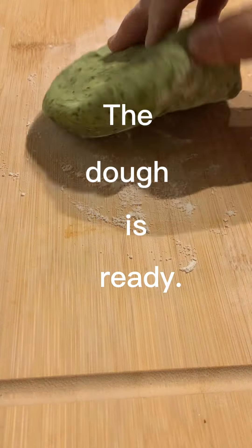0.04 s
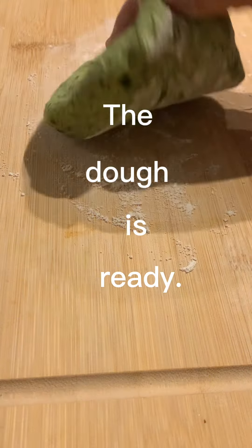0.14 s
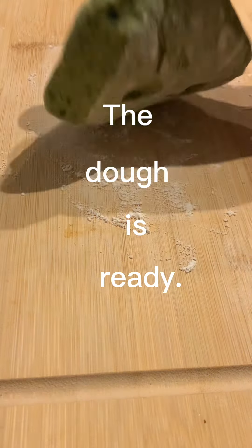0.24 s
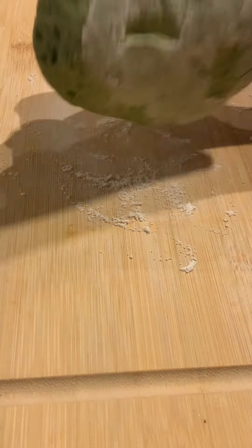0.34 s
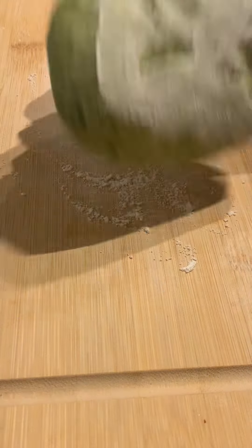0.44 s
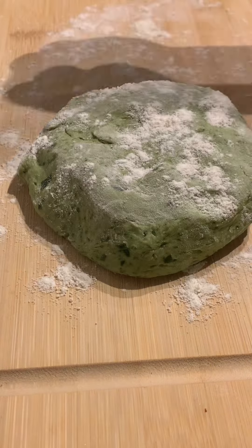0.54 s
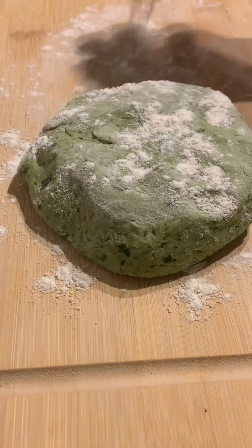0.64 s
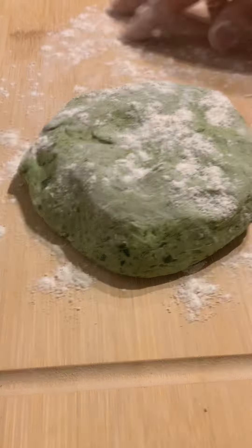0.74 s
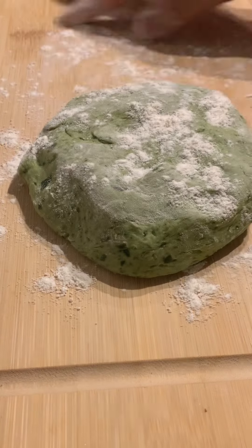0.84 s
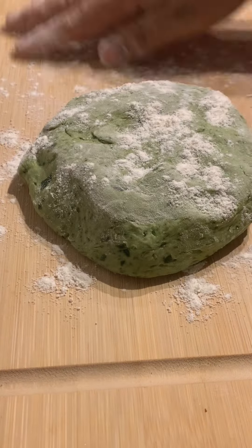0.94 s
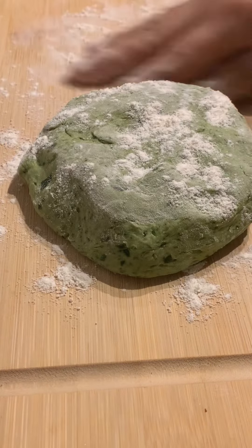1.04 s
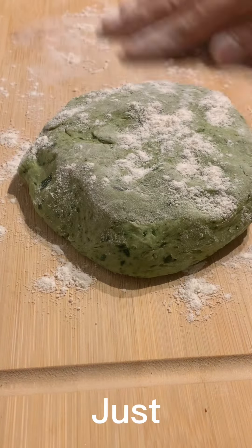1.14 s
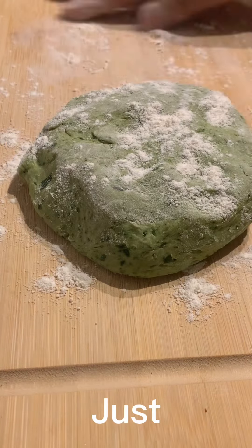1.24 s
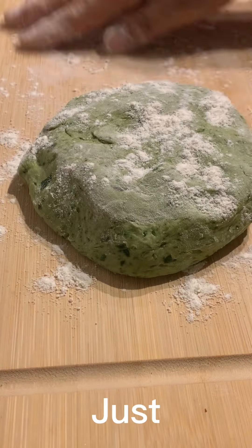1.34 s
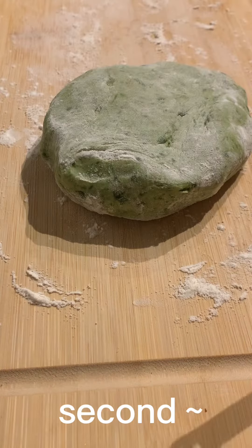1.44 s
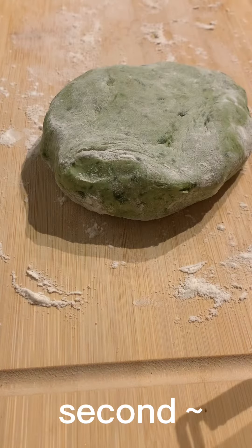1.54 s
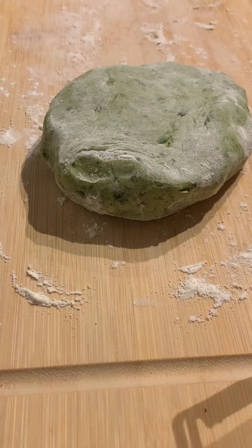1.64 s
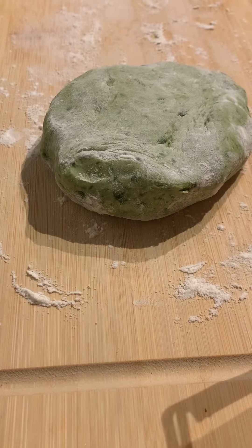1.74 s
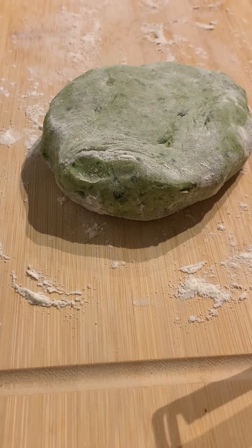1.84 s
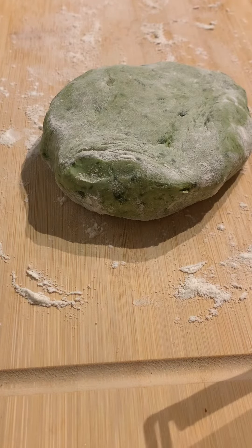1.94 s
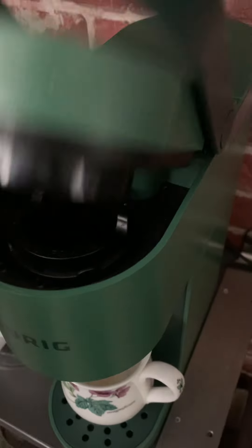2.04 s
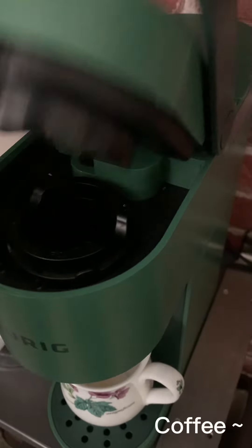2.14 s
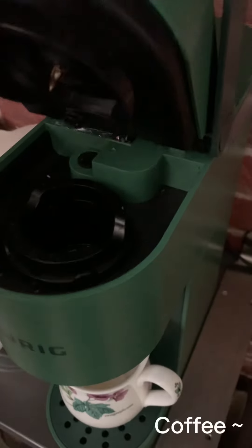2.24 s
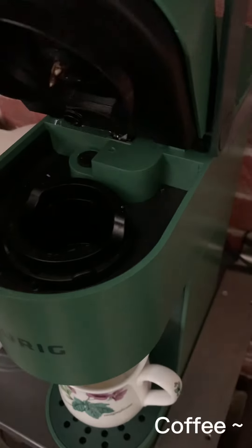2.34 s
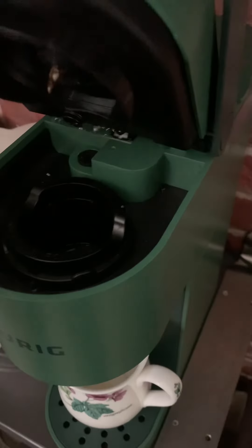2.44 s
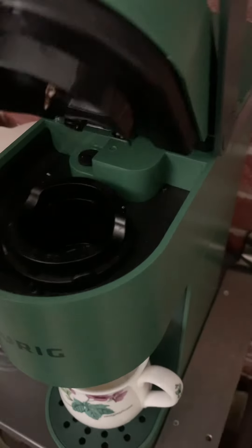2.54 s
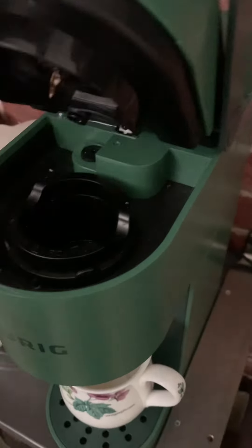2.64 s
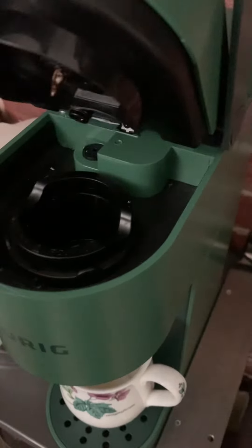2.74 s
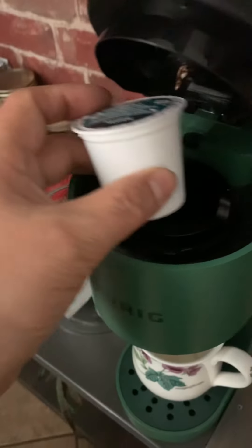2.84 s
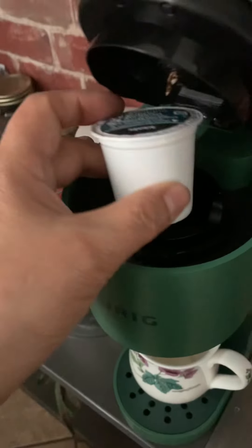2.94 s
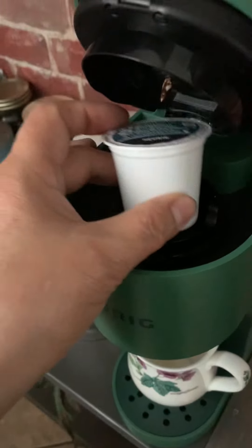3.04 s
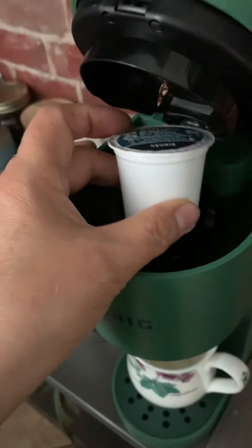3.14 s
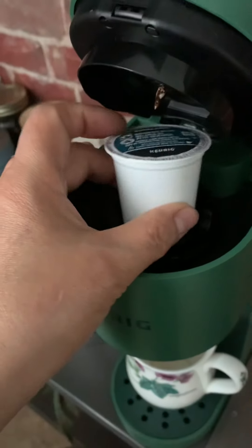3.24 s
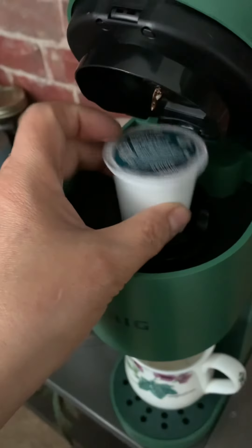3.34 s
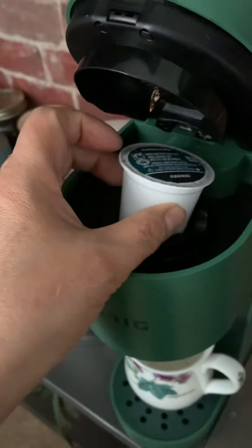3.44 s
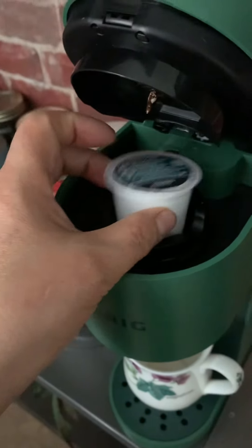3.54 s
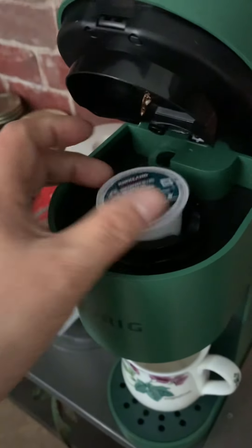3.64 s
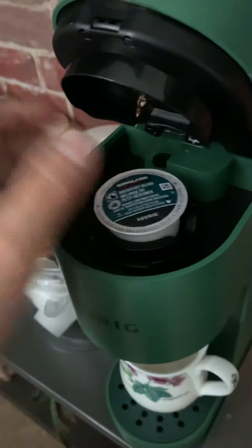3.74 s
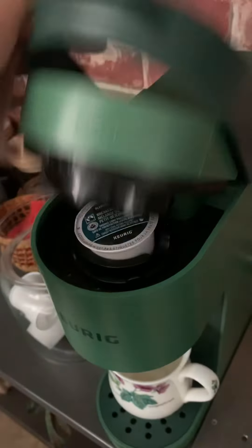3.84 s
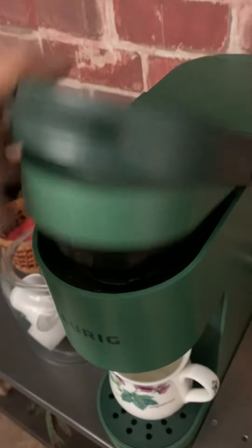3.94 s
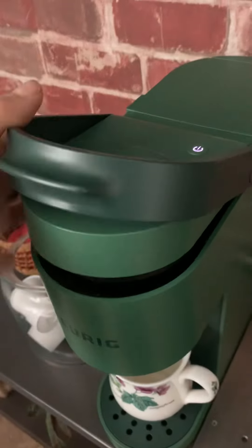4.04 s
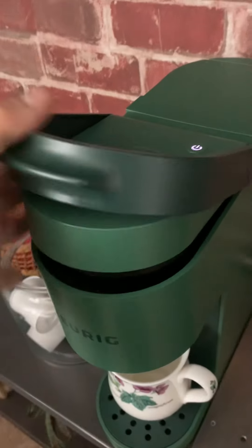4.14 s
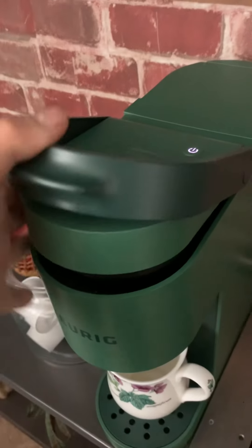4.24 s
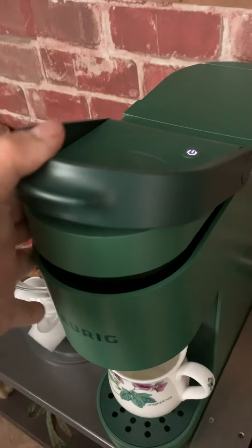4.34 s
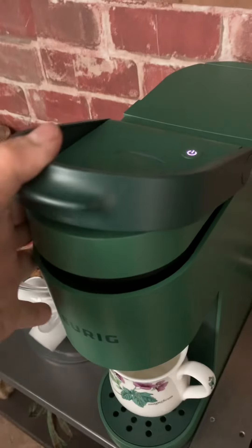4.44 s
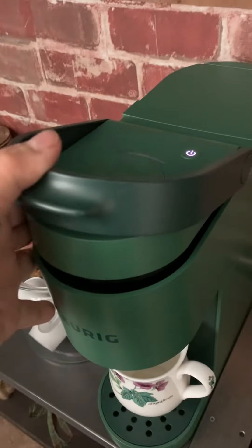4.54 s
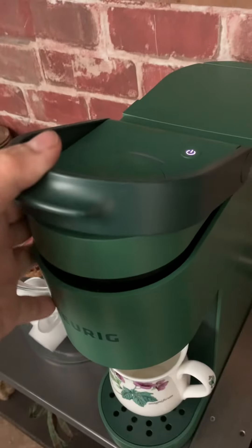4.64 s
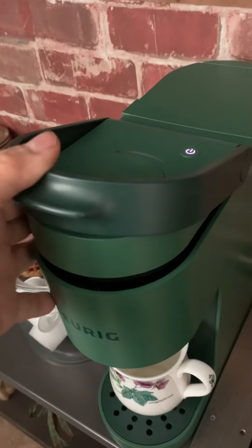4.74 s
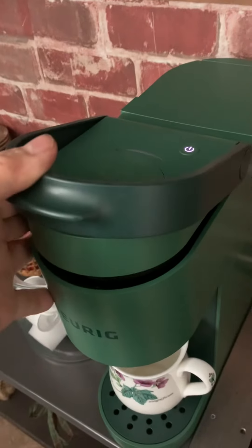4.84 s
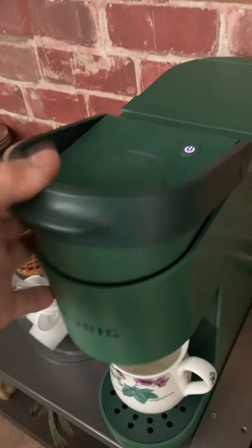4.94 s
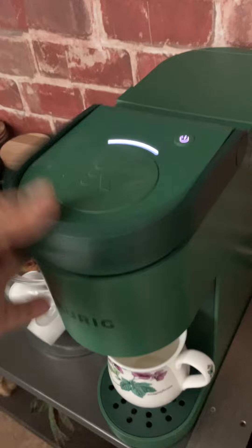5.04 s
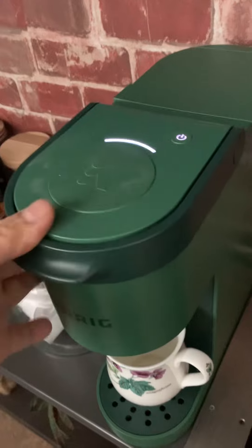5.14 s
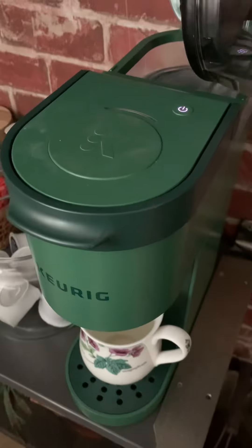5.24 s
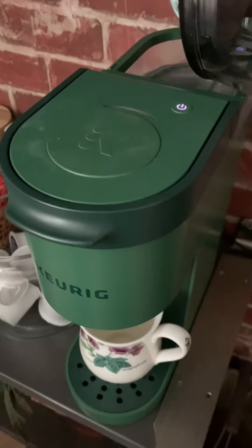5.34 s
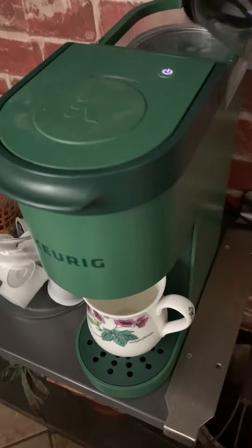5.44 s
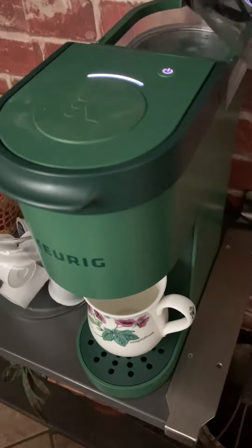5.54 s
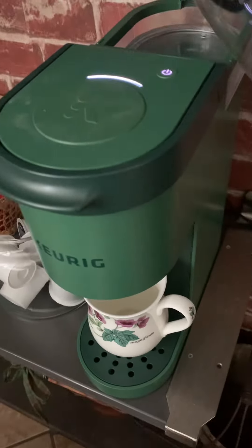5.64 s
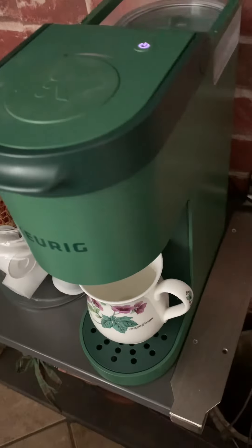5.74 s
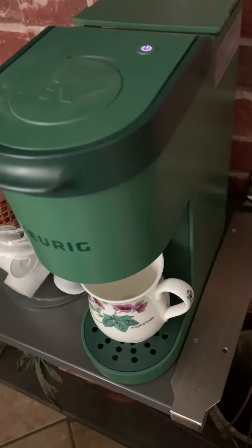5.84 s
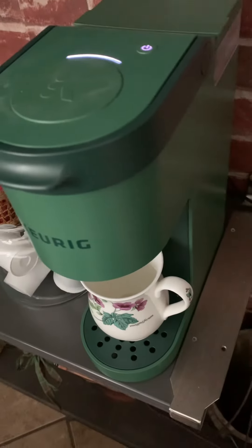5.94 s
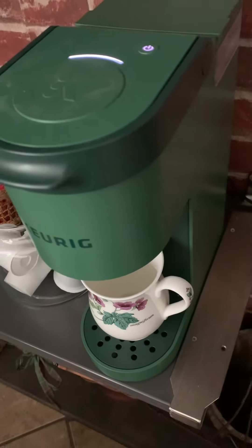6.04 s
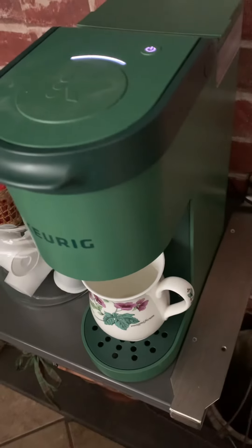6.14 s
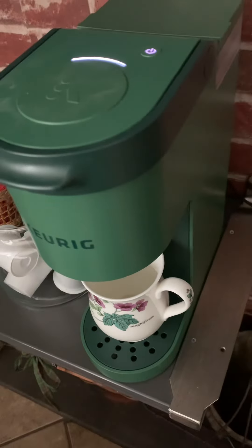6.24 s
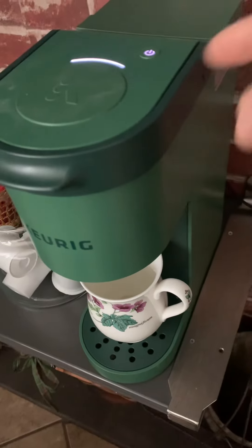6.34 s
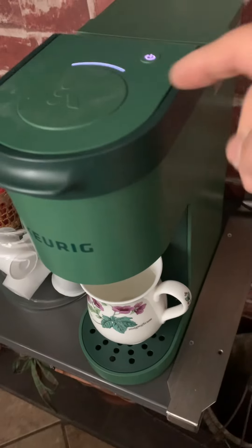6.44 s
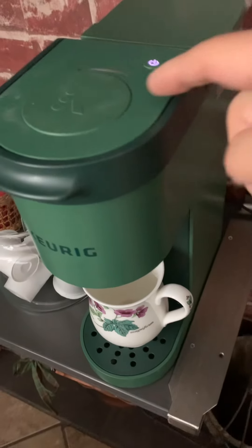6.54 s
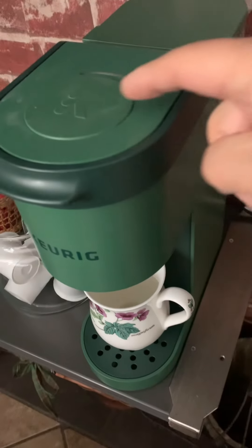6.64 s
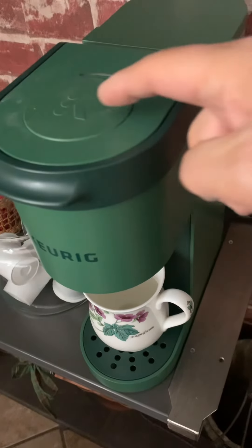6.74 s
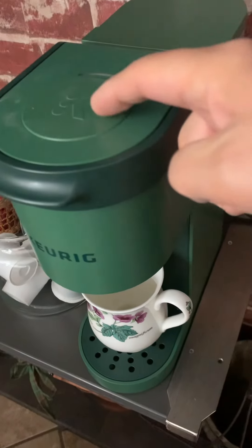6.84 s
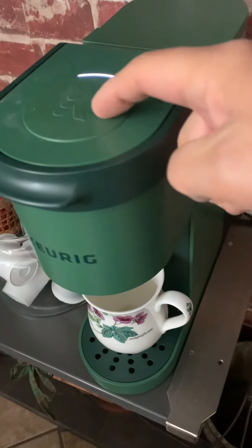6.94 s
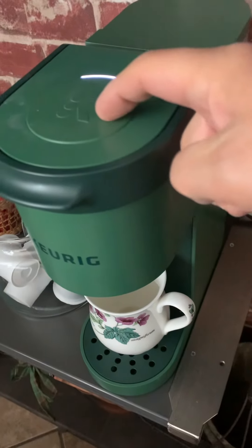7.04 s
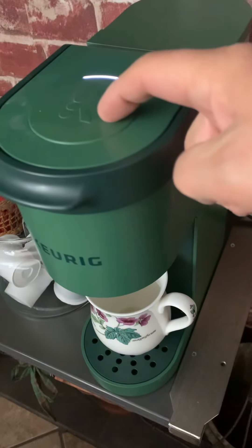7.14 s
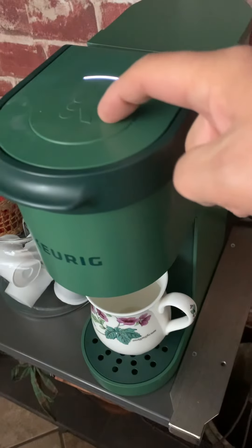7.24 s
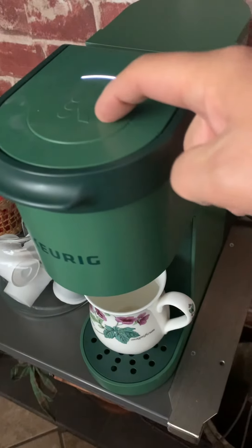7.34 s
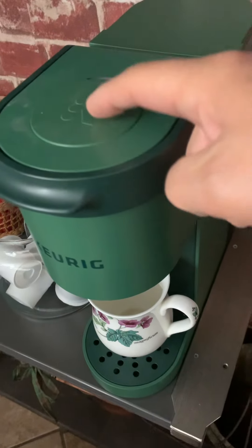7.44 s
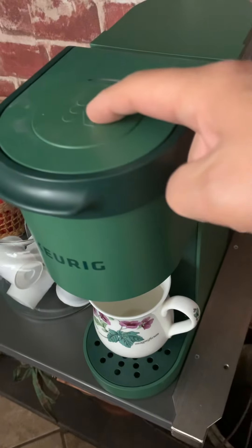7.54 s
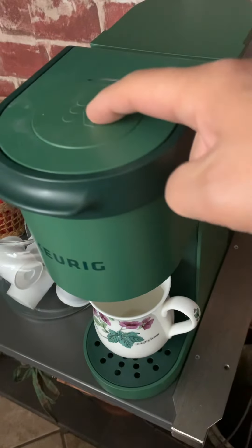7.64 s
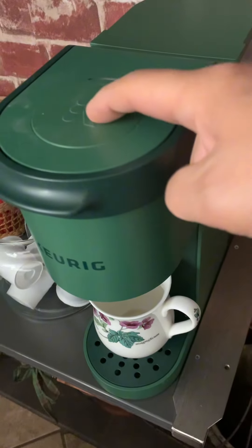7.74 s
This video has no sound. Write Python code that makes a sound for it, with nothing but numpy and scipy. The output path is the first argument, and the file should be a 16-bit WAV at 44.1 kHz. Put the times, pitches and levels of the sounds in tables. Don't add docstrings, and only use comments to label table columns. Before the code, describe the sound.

Quiet dry brushing on wood, a soft dough thump and a grainy palm sweep come first, then near silence with faint ticks. Hard plastic sounds follow at arm's length: handle knocks, rubbing, light pod taps, one sharp dominant lid clap, a small snap, a rattly latch, a hinge clack and a hollow cover knock. A long lull of faint rumble ends with a small double click. Short kitchen echo, with sudden scene changes.

```python
import sys
import numpy as np
from scipy import signal
from scipy.fft import rfft, irfft
from scipy.io import wavfile

SR = 44100
rng = np.random.default_rng(int(sys.argv[2]) if len(sys.argv) > 2 else 0)


def nominal_scale(level):
    x = np.asarray(level, float) / 20
    return 10 ** x


def master(y):
    cut = np.clip(np.atleast_2d(y).T, -1, 1)
    pcm = np.round(cut * 32767)
    wavfile.write(sys.argv[1], SR, pcm.astype(np.int16))


N = 343539

SCENE_CHANGES = [0, .5485, 1.389, 2.007, 2.807, 3.848, 5.002, 5.236, 5.45, 7.79]


def rms_one(x):
    return x / np.sqrt(np.mean(x ** 2) + 1e-20)


def band(x, low_hz, high_hz):
    return signal.sosfilt(signal.butter(2, [low_hz, high_hz], "band", fs=SR, output="sos"), x)


def flicker(rate_hz, depth_db):
    settle = 1500
    r = np.exp(-64 * np.pi * rate_hz / SR)
    noise = rng.standard_normal(N // 32 + settle + 2)
    slow = signal.lfilter([1], [1, -2 * r, r * r], noise)[settle:]
    return nominal_scale(depth_db * np.interp(np.arange(N) / 32, np.arange(len(slow)), rms_one(slow)))


def coloured(spectrum, low_hz, high_hz):
    hz, points = np.fft.rfftfreq(N, 1 / SR) + 1, np.array(spectrum)
    level_db = np.interp(np.log(hz), np.log(points[:, 0]), points[:, 1])
    gain = nominal_scale(level_db) * (hz > low_hz) * (hz < high_hz)
    return rms_one(irfft(rfft(rng.standard_normal(N)) * gain, N))


BLOW_BANDS = [600, 3000, 7000, 16500]


def blows(hits, modes, cycles, crack_db, rattle_db, rattle_s, top_db, bass_hz=170):
    size = 8192
    out, t = np.zeros(N), np.arange(size) / SR
    hz, level_db = np.transpose(modes)[:, :, None]
    bands = zip([bass_hz, *BLOW_BANDS], BLOW_BANDS)
    filters = [signal.butter(3, edges, "band", fs=SR, output="sos") for edges in bands]
    responses = [signal.sosfreqz(sos, np.fft.rfftfreq(size, 1 / SR), fs=SR)[1] for sos in filters]
    group = np.searchsorted(BLOW_BANDS, hz[:, 0])
    for s, mid_db, weight_db, hard_db, *shine_db in hits:
        ring = np.clip(0.88 + 0.0085 * weight_db - 0.019 * hard_db, .3, 1.2)
        strength = nominal_scale(level_db + 1.2 * rng.standard_normal(hz.shape))
        fall_db = -60 * t * hz ** .8 / (ring * cycles)
        sines = strength * np.sin(2 * np.pi * hz * t * rng.normal(1, .008, hz.shape))
        click = 2.2 + rfft(rng.standard_normal(size) * nominal_scale(-10 - 60 * t / .004))
        rattle_fall_db = rattle_db - 5.5 - 60 * t / (rattle_s * ring)
        rattle = rfft(rng.standard_normal(size) * nominal_scale(rattle_fall_db))
        at = round(s * SR)
        next_change = SCENE_CHANGES[np.searchsorted(SCENE_CHANGES, s)]
        sounding = np.clip((next_change - s - t) / .003, 0, 1)
        shine = hard_db + top_db + sum(shine_db)
        for k, db in enumerate(mid_db + np.array([weight_db, 0, hard_db, shine])):
            free = rfft((sines * nominal_scale(fall_db))[group == k].sum(axis=0))
            damped = rfft((sines * nominal_scale(4 * fall_db))[group == k].sum(axis=0))
            flat = nominal_scale(crack_db + 2.5 * k) * (np.abs(damped).max() + 1e-9)
            part = irfft(responses[k] * (click * (free + flat) + rattle * (damped + flat)), size)
            out[at:at + size] += (nominal_scale(db) * sounding * part / np.abs(part).max())[:N - at]
    return out


# start_s, level_db (peak, 600-3000 Hz), weight_db (thud below 600 Hz over level),
# hardness_db (3-7 kHz snap over level), for some shine_db (extra above 7 kHz)
LID_HITS = [(3.8604, -45.5, -2, -2), (3.914, -38.5, 5.5, 1.5), (3.9212, -4, -30, -7, -2),
            (3.9365, -15, -16, -16, -8), (3.9815, -21, -13, -2, -15), (3.9882, -3, -18, -6, 6),
            (4.0494, -30, -20, 9, 3), (4.0512, -34, -20, 10, -3), (4.1953, -42, -14, 2, 10),
            (4.211, -46, -10, -14), (4.2202, -58, -6, 4, 8), (4.232, -48, -6, -10),
            (4.2541, -48, -12, 2, 6)]
# pitch_hz, level_db
LID_MODES = [(330, -16), (550, -3), (716, -6), (1420, 11), (1860, 0), (2170, 10), (2840, 3), (3450, 1),
             (4060, 3.5), (4750, 2.5), (6500, -1.5), (7200, -1.5), (10000, -5), (13000, -3)]


def lid():
    return blows(LID_HITS, LID_MODES, cycles=6.0, crack_db=-24.0, rattle_db=-10.5, rattle_s=.07, top_db=-9)


# start_s, level_db, weight_db, hardness_db, shine_db
CATCH_HITS = [(4.337, -58, -20, -12), (4.3604, -12, -45, -12, -3), (4.3886, -43, -28, -8, 0),
              (4.445, -62, -10, 8, -12), (4.456, -29, -28, -16, -15), (4.4726, -56, -8, 0, -10),
              (4.5263, -54, -10, 0, -15), (4.5458, -55, -9, -2, -15), (4.554, -59, -9, -2, -15),
              (4.5737, -56, -16, 0, -15), (4.6315, -58, -8, -3, -15), (4.678, -62, -8, -15)]
# pitch_hz, level_db
CATCH_MODES = [(145, 0), (690, -30), (1100, -15), (1460, -15), (2100, 0), (2450, -1), (2700, 3), (2900, 4),
               (3470, 2), (3870, 3), (4900, -3), (8160, 0)]


def catch():
    return blows(CATCH_HITS, CATCH_MODES, cycles=6.0, crack_db=-24, rattle_db=-12, rattle_s=0.03,
                 top_db=-17, bass_hz=109)


# start_s, level_db, weight_db, hardness_db, shine_db
LATCH_HITS = [
    (4.7628, -56.5, -11.5, -5.5),
    (4.783, -54, -13, 6, 4),
    (4.7875, -44, -13, -1, 2),
    (4.7991, -40.5, -34.5, -7.5),
    (4.8916, -54, -8, 16, -2),
    (4.9031, -42.5, -35.5, 2),
    (4.9147, -17, -30, 13, -3),
    (4.9278, -13, -6, 4, 1),
    (4.9315, -14, 0, -14),
    (4.9417, -23, 4, 0),
]
# pitch_hz, level_db
LATCH_MODES = [(260, -7), (530, 5), (720, 6), (1100, -6), (1500, -8), (2100, -20), (2900, 5), (3490, 1),
               (4900, 3), (5500, 1), (7100, -8), (7750, 0)]


def latch():
    return blows(LATCH_HITS, LATCH_MODES, cycles=7.0, crack_db=-19, rattle_db=-6.0, rattle_s=0.13, top_db=-4.5)


# start_s, level_db, weight_db, hardness_db, shine_db
HINGE_HITS = [(5.074, -40, 2, -12), (5.0885, -27, 0, -4), (5.0915, -12, -9, 8, 6),
              (5.0928, -17, -14, 14, -11), (5.097, -21, -3, -9, -8), (5.126, -32, -2, -3, -6),
              (5.142, -34, 3, -2, -6), (5.2416, -41, 0, -12), (5.279, -70, -5, 0, 8),
              (5.2886, -70, 3, 20, -12), (5.306, -74, -5, 0, 8), (5.3262, -59, 0, -3, 2),
              (5.3475, -61.5, 3.5, 0.5), (5.5727, -57, -12, 3, 8)]
# pitch_hz, level_db
HINGE_MODES = [(195, 0), (330, -9), (520, -8), (650, 2), (860, 1), (1530, 4), (2870, -10), (3430, -6),
               (3950, -7), (4640, 5), (5070, 4), (5510, 3), (6860, -5), (8670, -10), (12800, -8)]


def hinge():
    return blows(HINGE_HITS, HINGE_MODES, cycles=4.3, crack_db=-18, rattle_db=-14, rattle_s=0.15, top_db=-11)


# start_s, level_db, weight_db, hardness_db, shine_db
COVER_HITS = [
    (5.7663, -71.5, 21.5, 2.4),
    (5.7802, -56, 12, -2),
    (5.791, -52, 16, -6),
    (5.8024, -14, 3, 3, 5),
    (5.8167, -36, 14, -2, -8),
    (5.8257, -34, 10, 5, -6),
    (5.8515, -19, -9, 2, 2),
]
# pitch_hz, level_db
COVER_MODES = [(205, 14), (343, 12), (490, 14), (580, 21), (800, 11), (1300, 6), (1990, 9), (2350, 7),
               (3400, 3), (4500, 5), (5700, 0), (8900, -14), (11500, 0), (12900, 2)]


def tank_cover():
    return blows(COVER_HITS, COVER_MODES, cycles=5.6, crack_db=-15.0, rattle_db=-5, rattle_s=0.081, top_db=4.0)


# start_s, level_db, weight_db, hardness_db, shine_db
POD_HITS = [
    (3.1394, -32, -14, -26, -14),
    (3.273, -45, -10, -10),
    (3.288, -26, -19.5, -13, -4),
    (3.3643, -17, -19, -12, 3),
    (3.3709, -27, -7.5, -9.5),
    (3.5078, -36.5, -19.5, -9),
    (3.5644, -26.5, -20, -10),
    (3.6081, -32, 3, 1, 4),
    (3.66, -62, -10, 4, 10),
]
# pitch_hz, level_db
POD_MODES = [(335, -6.5), (565, -2), (940, 2.5), (1300, 9), (2040, 5), (2450, 4), (3400, 11.5), (4450, 8),
             (6250, 9.5), (7800, 0)]


def pod():
    return blows(POD_HITS, POD_MODES, cycles=4.5, crack_db=-12, rattle_db=-8, rattle_s=0.033, top_db=-1)


# start_s, level_db, weight_db, hardness_db, shine_db
HANDLE_HITS = [
    (2.2192, -38, -4, -14, -10),
    (2.2297, -24, -11, -10.5, -10),
    (2.2438, -32, -5, 7, -5),
    (2.3105, -58, -8, 0, 3),
    (2.4606, -52, -12, -1),
    (2.4781, -34, -4, -9, -26),
    (2.588, -62, 4, -2, 6),
    (2.8073, -36, -16, -9.5),
]
# pitch_hz, level_db
HANDLE_MODES = [(208, -3), (333, 2.5), (457, -5.5), (910, 2.5), (1600, -6), (1900, 2), (3450, 0), (4600, 3),
                (6300, 0), (8300, 5), (10200, 0)]


def handle():
    return blows(HANDLE_HITS, HANDLE_MODES, cycles=8.7, crack_db=-9.5, rattle_db=-5.0, rattle_s=0.077, top_db=-3)


# start_s, level_db, weight_db, hardness_db, shine_db
BUTTON_HITS = [
    (7.6218, -73, 12, -5),
    (7.7358, -35, -8, -3, -9),
    (7.7612, -36, -7, 5, 2),
    (7.7655, -50, 14, 12, 2),
]
# pitch_hz, level_db
BUTTON_MODES = [(295, 0), (748, -2), (1700, 1), (2750, 4), (3110, 8), (3800, 2), (5500, 5), (7600, 10),
                (11400, 9)]


def button():
    return blows(BUTTON_HITS, BUTTON_MODES, cycles=7.6, crack_db=-13, rattle_db=-0.5, rattle_s=0.048, top_db=6)


# start_s, level_db, weight_db, hardness_db
DOUGH_HITS = [
    (.454, -45, 1, -13),
    (.465, -50, 20, -16),
    (.488, -58, 25, -18),
    (.534, -44, 3, -16),
    (1.949, -76, 22, -3),
]
# pitch_hz, level_db
BOARD_MODES = [(90, 8), (132, 5), (203, -3.5), (700, -20), (1200, -12), (1700, -14), (2770, -12)]


def dough():
    return blows(DOUGH_HITS, BOARD_MODES, cycles=9.0, crack_db=-22, rattle_db=-8, rattle_s=.09,
                 top_db=-6, bass_hz=60)


# start_s, level_db, weight_db, hardness_db
CRUMB_HITS = [
    (1.452, -72, -15, 2),
    (1.49, -76, -15, 6),
    (1.551, -72, -20, 11),
    (1.663, -76, -15, 6),
    (1.68, -64, -20, 0),
    (1.775, -78, -15, 6),
]
# pitch_hz, level_db
CRUMB_MODES = [(300, 0), (1500, 0), (2200, -3), (2700, 0), (4600, 0), (5200, -2), (6200, 0), (8000, 0),
               (13700, -6)]


def crumbs():
    return blows(CRUMB_HITS, CRUMB_MODES, cycles=9.0, crack_db=-12, rattle_db=1, rattle_s=.12, top_db=-10)


def swells(rows, spread):
    out, ratio = np.zeros(N), 1 + np.clip(spread, .01, .45)
    for s, length, hz, level_db in rows:
        size, at = round(length * SR), round((s - length) * SR)
        noise = band(rng.standard_normal(SR), hz / ratio, min(hz * ratio, SR / 2.2))
        voice = rms_one(noise)[-2 * size:]
        out[at:at + 2 * size] += nominal_scale(level_db - 8.5) * rms_one(voice * np.hanning(2 * size) ** 2)
    return out


# peak_s, length_s, pitch_hz, level_db
PUSHES = [(5.112, .025, 210, -35), (.5, .045, 1200, -56), (.725, .03, 110, -48), (.79, .08, 55, -50),
          (1.25, .15, 300, -60), (2.26, .05, 100, -48), (2.6, .14, 220, -50), (2.5, .03, 350, -46),
          (2.54, .04, 500, -55), (2.58, .02, 300, -52), (2.66, .03, 300, -56), (2.05, .05, 800, -62),
          (2.16, .04, 800, -60), (2.33, .08, 800, -60), (5.17, .07, 500, -44), (5.26, .03, 300, -50),
          (1.8, .3, 3000, -86), (3.287, .022, 1300, -31), (4.14, .05, 170, -50), (4.822, .025, 720, -40),
          (4.832, .025, 260, -30), (4.96, .045, 82, -36), (5.13, .07, 72, -40), (5.84, .05, 90, -49),
          (6.65, .35, 2000, -76), (6.7, .3, 380, -70), (7.06, .012, 1000, -71), (7.46, .012, 1550, -73)]


def pushes():
    return swells(PUSHES, .37)


# peak_s, length_s, pitch_hz, level_db
SQUEAKS = [(1.691, 0.03, 6200, -70), (1.876, 0.049, 6200, -69.5), (2.83, 0.037, 577, -40),
           (2.94, 0.063, 1220, -43), (3.395, 0.044, 335, -37), (3.57, 0.026, 8000, -45.5),
           (3.617, 0.016, 570, -32), (3.645, .03, 520, -45), (3.635, 0.04, 330, -41),
           (3.952, 0.01, 6400, -21.5), (3.958, 0.018, 8020, -27), (3.965, .035, 14800, -35),
           (3.972, 0.039, 7100, -31.5), (4.136, 0.03, 325, -38), (4.5, .45, 141.7, -62.5),
           (4.62, 0.086, 4450, -70.5), (4.802, 0.018, 1540, -42), (4.82, .012, 9600, -57),
           (5.298, 0.018, 5860, -64), (7.742, 0.011, 759, -27), (.14, .12, 390, -61), (.27, .09, 330, -61),
           (.29, .12, 450, -63), (.38, .08, 370, -61), (.03, .03, 690, -58), (1.875, .04, 2700, -71),
           (.54, .014, 640, -52), (.537, .014, 1230, -48)]


def squeaks():
    return swells(SQUEAKS, .07)


# peak_s, length_s, pitch_hz, level_db
WHISTLES = [(.28, .05, 7100, -68), (.275, .035, 10200, -74), (.36, .035, 10100, -79), (.37, .04, 7050, -76),
            (1.7, .3, 13700, -92), (3.37, .1, 7000, -64), (2.43, .05, 8800, -68), (4.12, .09, 13400, -62),
            (4.13, .07, 6600, -60), (4.42, .04, 6500, -75), (4.42, .05, 5100, -70), (4.63, .06, 5200, -77),
            (4.635, .05, 6600, -77), (4.96, .04, 2920, -41), (2.4, .07, 3200, -66), (2.41, .06, 4500, -66),
            (2.38, .05, 5100, -68), (2.4, .06, 6000, -68), (2.2, .05, 4600, -66)]


def whistles():
    return swells(WHISTLES, .014)


def friction(peaks, grain_db, base_db):
    slips = rng.standard_normal(N) * nominal_scale(grain_db * rng.exponential(1, N))
    out = nominal_scale(base_db) * band(slips, 710, 4000)
    for k, (hz, width_hz, level_db) in enumerate(peaks):
        r = np.exp(-np.pi * width_hz / SR)
        poles = [1, -2 * r * np.cos(2 * np.pi * hz / SR), r * r]
        peak = signal.lfilter([(1 - r * r) / 2, 0, (r * r - 1) / 2], poles, slips)
        out += (-1) ** k * nominal_scale(level_db) * flicker(14, 1.5) * peak
    return rms_one(out)


def strokes(rows):
    body, hiss = np.zeros((2, N))
    for peak_s, rise_s, fall_s, db, bright_db in rows:
        k = np.searchsorted(SCENE_CHANGES, peak_s)
        first, last = round(SCENE_CHANGES[k - 1] * SR), min(round(SCENE_CHANGES[k] * SR), N)
        at = np.arange(first, last)
        away = np.maximum((peak_s - at / SR) / rise_s, (at / SR - peak_s) / fall_s)
        gain = nominal_scale(db - 24 * np.minimum(away, 2) ** 2.2)
        body[at] += gain
        hiss[at] += gain * nominal_scale(bright_db)
    return body, hiss


# pitch_hz, level_db (per Hz)
HISS = [(1500, -26), (2300, -5), (3300, 1.5), (5000, 1), (7900, -3.5), (11000, -6.5), (14500, -9),
        (16500, -18)]


def dry_hiss(low_hz):
    return coloured(HISS, low_hz, 16600)


# time_s, level_db, brightness_db
SWEEP = [
    (.685, -74, -3),
    (.71, -49, 0),
    (.758, -42, -13),
    (1.0, -37, -13),
    (1.13, -38.5, -3),
    (1.25, -39, -13.5),
    (1.387, -37, -12.5),
]
# pitch_hz, width_hz, level_db
SWEEP_PEAKS = [(701.5, 55.5, -3), (1252, 121.6, 1.5), (1637, 64, -0.5), (2027, 550, -3), (2900, 210, -6),
               (4060, 420, -14.5)]
# peak_s, rise_s, fall_s, level_db, brightness_db
BRUSHES = [
    (.004, .02, 0.079, -47.5, -7),
    (.21, 0.19, 0.055, -56.5, -0.5),
    (.33, 0.13, 0.2, -83, -4),
    (.47, 0.033, 0.04, -63.5, -10),
    (.54, 0.014, 0.021, -57, -12.5),
]
# pitch_hz, width_hz, level_db
BRUSH_PEAKS = [(1220, 87, 0), (1680, 45, 0), (2070, 50, -4), (2410, 51, -3), (2800, 79, -4),
               (4300, 130, -9), (5370, 120, -8), (7190, 300, -9)]


def palm():
    s, *columns = np.transpose(SWEEP)
    level_db, bright_db = [np.interp(np.arange(N) / SR, s, c, left=-200, right=-200) for c in columns]
    body, hiss = strokes(BRUSHES)
    wood = friction(SWEEP_PEAKS, grain_db=-1.0, base_db=-13.5)
    light = friction(BRUSH_PEAKS, grain_db=1.0, base_db=-19)
    hiss = hiss + nominal_scale(level_db + bright_db)
    return body * light + nominal_scale(level_db) * wood + hiss * flicker(28, 0.38) * dry_hiss(1800)


# peak_s, rise_s, fall_s, level_db, brightness_db
RUBS = [(2.012, 0.002, 0.077, -68, 2.5), (2.22, 0.51, 0.049, -73, 2), (2.43, 0.13, 0.041, -71, 11),
        (2.812, 0.008, 0.082, -39.5, -26), (2.936, 0.07, 0.13, -43.5, -20), (3.2, 0.1, 0.052, -56.5, -37),
        (3.31, 0.078, 0.11, -52.5, -2), (3.4, 0.046, 0.14, -65, -0.5), (3.56, 0.084, 0.031, -49.5, -4),
        (3.63, 0.057, 0.1, -55.5, -7.5), (3.852, 0.0088, 0.2, -61, -4.5), (4.07, 0.09, 0.24, -58.5, -0.5),
        (5.083, 0.044, 0.016, -46, -9.5), (5.25, 0.014, 0.21, -68, -9), (6.15, 0.25, 0.25, -72.5, -5.5),
        (6.75, .4, 0.29, -86, -11.5)]
# pitch_hz, width_hz, level_db
SLIDE_PEAKS = [(642, 110, 7), (1240, 600, 1), (1822, 1500, -11), (2700, 360, -8)]


def sliding():
    body, hiss = strokes(RUBS)
    rustle = background()[2]
    body, hiss = body + rustle, hiss + nominal_scale(-2.5) * rustle
    dry_noise = dry_hiss(1500)
    edges_hz = [1500, 3000, 4200, 5400, 6800, 8500, 11000, 13500, 16600]
    patches = np.zeros(N)
    for k in range(8):
        patches += (-1) ** k * flicker(20, 1.7) * band(dry_noise, *edges_hz[k:k + 2])
    rub = band(friction(SLIDE_PEAKS, grain_db=3.0, base_db=-11.5), 390, 5200)
    return body * rub + hiss * flicker(70, 2.0) * rms_one(patches)


# peak_s, rise_s, fall_s, level_db (over 10 kHz), lower_db (7 kHz band over that)
SHEEN = [(.004, .02, .07, -60, 3), (.21, .1, .045, -60, 0), (.42, .04, .04, -74, -6),
         (.47, .015, .025, -68, -9), (2.012, .004, .1, -68, -4), (2.23, .07, .06, -69, 7),
         (2.44, .09, .025, -66, 0), (3.32, .07, .1, -57, 0), (3.55, .08, .15, -60, 1),
         (4.1, .14, .14, -62, -6), (4.97, .04, .2, -54, 7), (5.13, .04, .1, -54, -8),
         (5.29, .006, .03, -70, -14), (5.33, .004, .02, -68, -14), (2.93, .08, .1, -76, 10),
         (3.22, .05, .1, -84, 13)]


def sheen():
    top, below = strokes(SHEEN)
    white = rng.standard_normal((2, N))
    high = top * rms_one(band(white[0], 10500, 15600))
    lower = below * rms_one(band(white[1], 6400, 8400))
    return flicker(40, 1.5) * (high + lower)


# pitch_hz (band centre), t60_s, level_db
ROOM = [(108, 0.4, -26.5), (270, 0.33, -27), (502.6, .4, -29), (1000, 0.32, -26), (2200, 0.4, -27),
        (4076, 0.44, -26), (8000, 0.2, -27), (12900, .22, -23)]


def kitchen(x):
    t = np.arange(round(.6 * SR)) / SR
    build = np.clip(t / 0.0036, 0, 1)
    echo = np.zeros(len(t))
    for hz, t60, db in ROOM:
        noise = rms_one(band(rng.standard_normal(len(t)), hz / 1.41, hz * 1.35))
        echo += nominal_scale(db) * noise * nominal_scale(-60 * t / t60) * build / 30
    out = np.zeros(N)
    for start_s, end_s in zip(SCENE_CHANGES, SCENE_CHANGES[1:]):
        a, b = round(start_s * SR), round(end_s * SR)
        piece = x[a:b]
        fade = np.clip((b - a - np.arange(len(piece))) / (.003 * SR), 0, 1)
        out[a:b] = signal.fftconvolve(piece, echo)[:len(piece)] * fade
    return out


# rumble_start_db, rumble_end_db, fan_db, rustle_db (of the hand)
FLOOR = [(-69, -67, -70, -78), (-83.5, -61, -77, -81), (-80, -79, -83.5, -87), (-58.5, -55, -68.5, -74.5),
         (-63.5, -58, -62.5, -83), (-55.5, -64.5, -71, -78.5), (-50, -51, -64.5, -73.5),
         (-60, -56, -73, -88.5), (-63, -57, -70.5, -88)]


def background():
    t = np.arange(N) / SR
    k = np.clip(np.searchsorted(SCENE_CHANGES, t) - 1, 0, len(FLOOR) - 1)
    first_db, last_db, fan_db, rustle_db = np.transpose(FLOOR)[:, k]
    share = (t - np.take(SCENE_CHANGES, k)) / np.diff(SCENE_CHANGES)[k]
    return nominal_scale(first_db + share * (last_db - first_db)), nominal_scale(fan_db), nominal_scale(rustle_db)


# pitch_hz, level_db (per Hz)
HOUSE = [(12, -62), (20, -44), (40, -8), (64, 5.5), (171, -19.5), (280, -18), (310, -19.5), (358, -17.5),
         (439, -31), (640, -36), (830, -67), (1410, -120)]
# pitch_hz, level_db (per Hz)
AIR = [(600, 0), (1200, -13), (2400, -19), (16000, -23)]


def house():
    low, murmur, _ = background()
    rumble = low * flicker(3, 1.5) * coloured(HOUSE, 20, 150)
    fan = murmur * flicker(5, 1.2) * coloured(HOUSE, 150, 640)
    return rumble + fan + nominal_scale(-84) * coloured(AIR, 733.8, 21000)


def scene():
    cover = tank_cover()
    hits = lid() + catch() + latch() + hinge() + pod() + handle() + button() + dough() + crumbs()
    hits += pushes() + squeaks() + whistles()
    echo = kitchen(hits + nominal_scale(7) * cover)
    return (hits + cover + echo + palm() + sliding() + sheen() + house())[None]


def roll_off(x):
    return signal.sosfilt(signal.butter(12, 16670, fs=SR, output="sos"), x)


def record(dry):
    thin = signal.sosfilt(signal.butter(2, 36, "high", fs=SR, output="sos"), dry)
    thin = signal.sosfilt(signal.cheby1(12, .5, 15700, fs=SR, output="sos"), thin)
    return roll_off(0.73 * np.tanh(thin / 0.73))


dry = scene()
out = record(dry)
master(out)
```